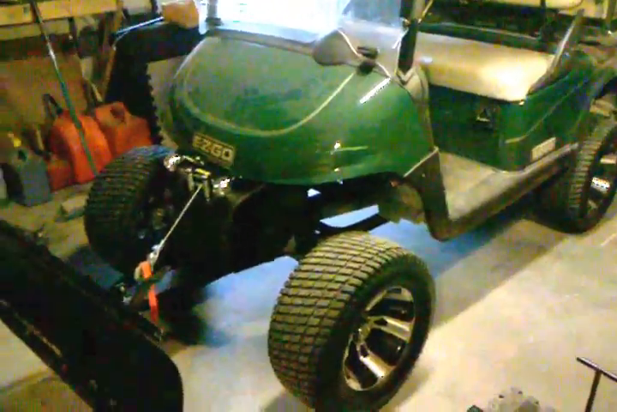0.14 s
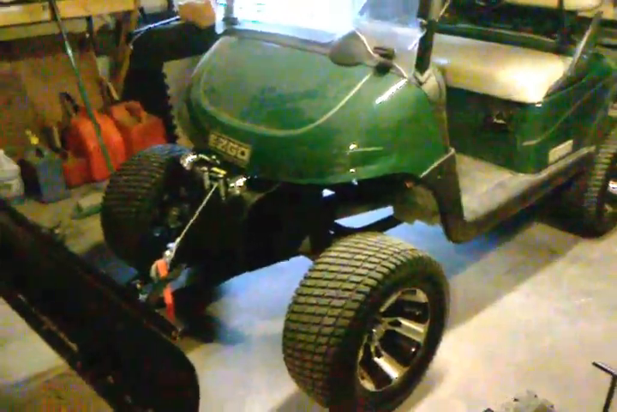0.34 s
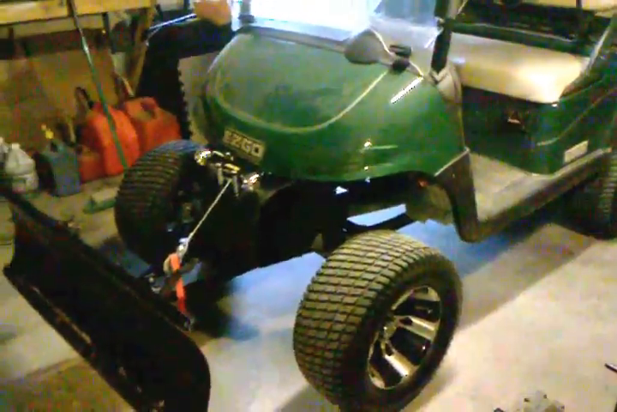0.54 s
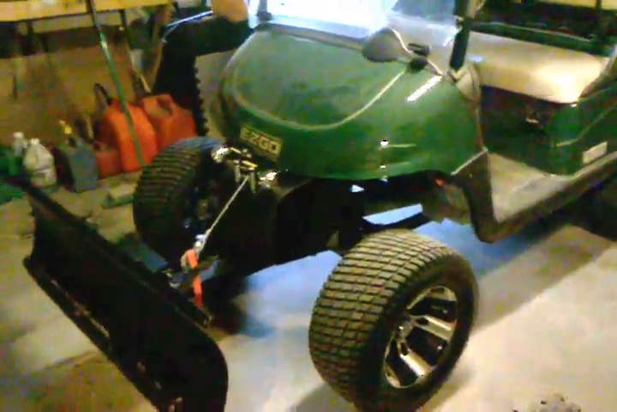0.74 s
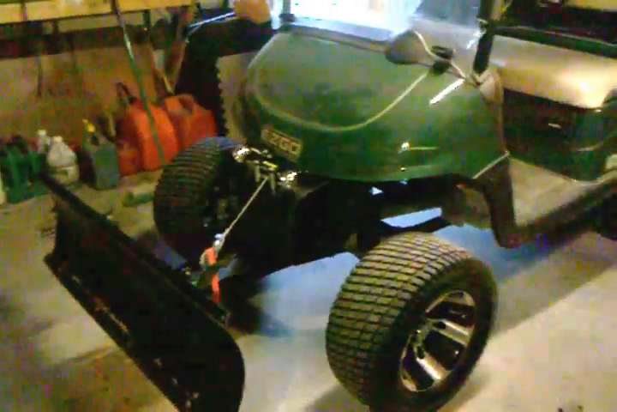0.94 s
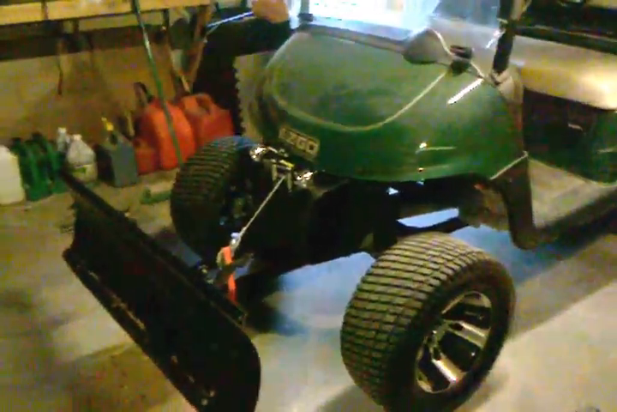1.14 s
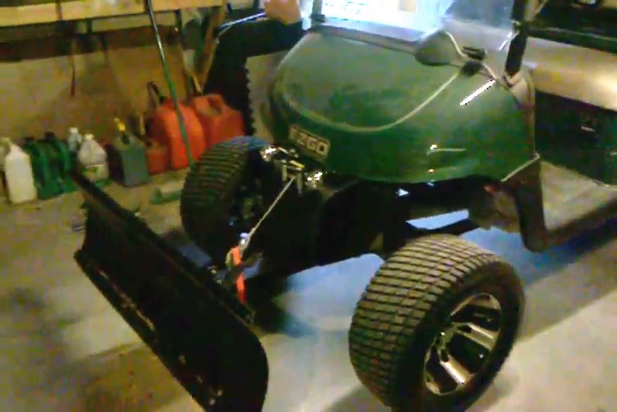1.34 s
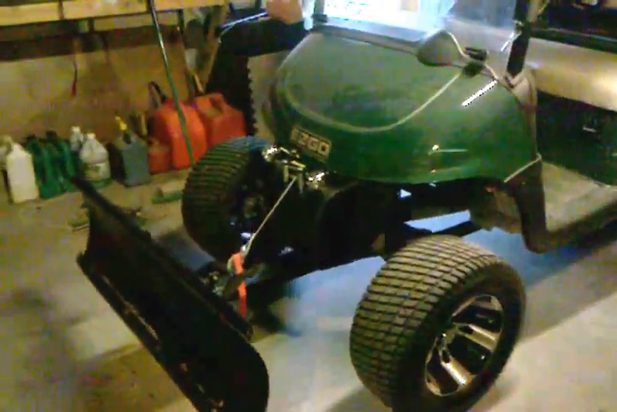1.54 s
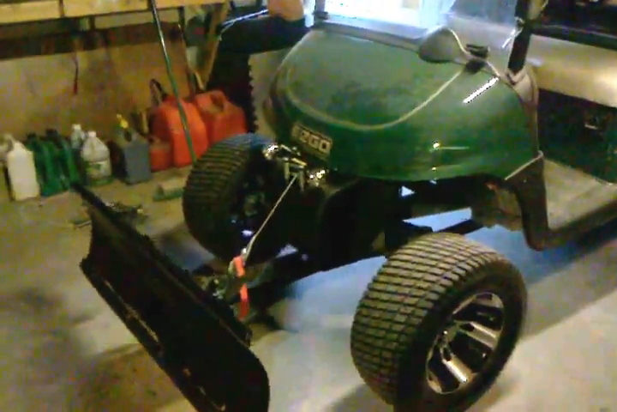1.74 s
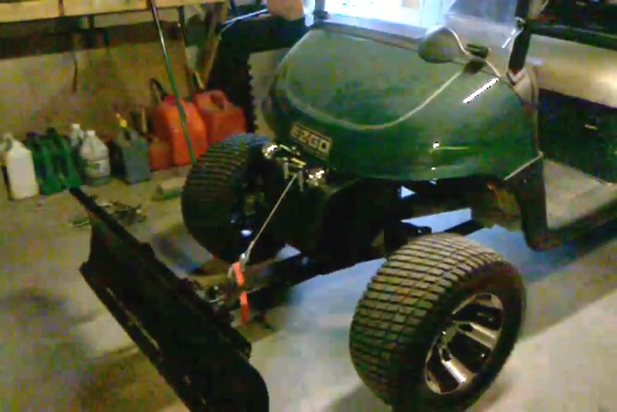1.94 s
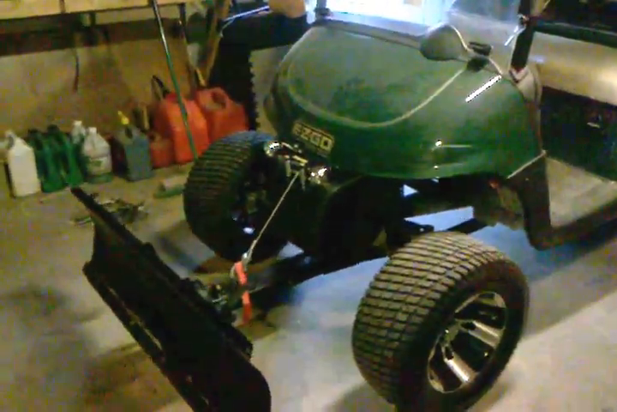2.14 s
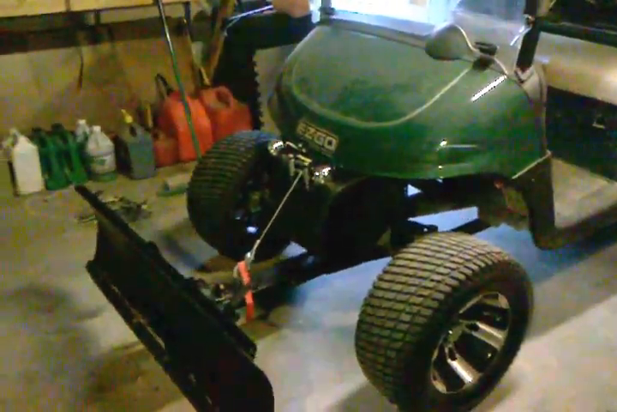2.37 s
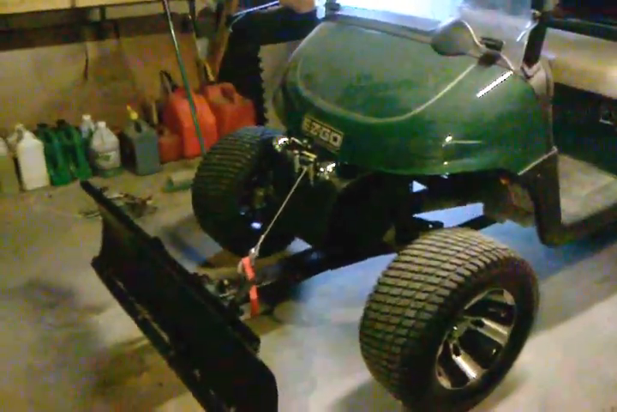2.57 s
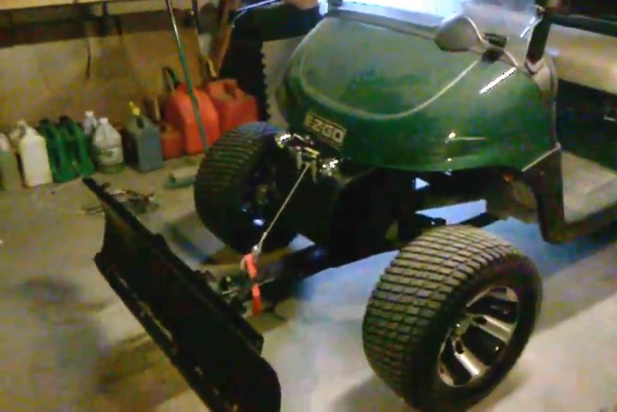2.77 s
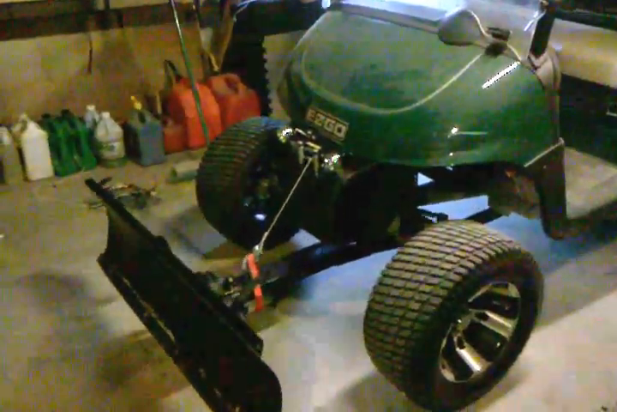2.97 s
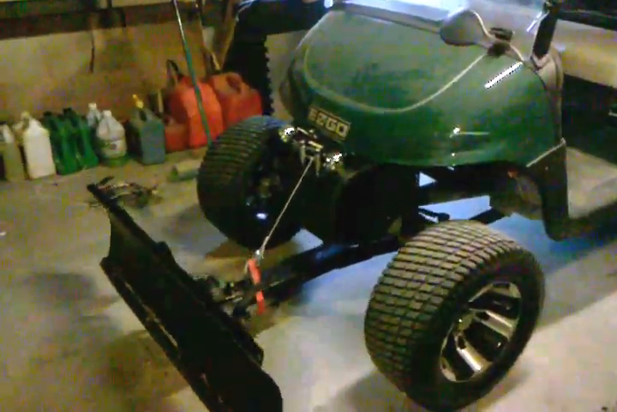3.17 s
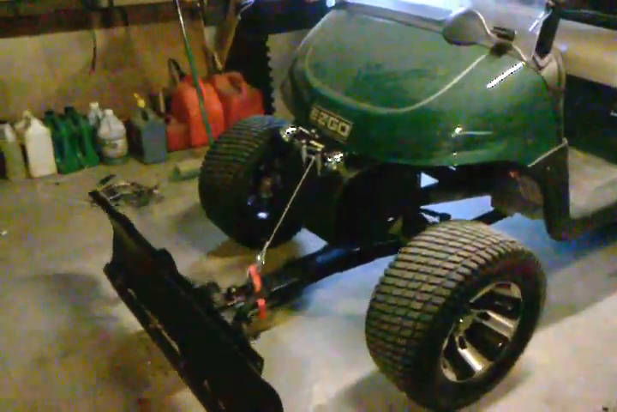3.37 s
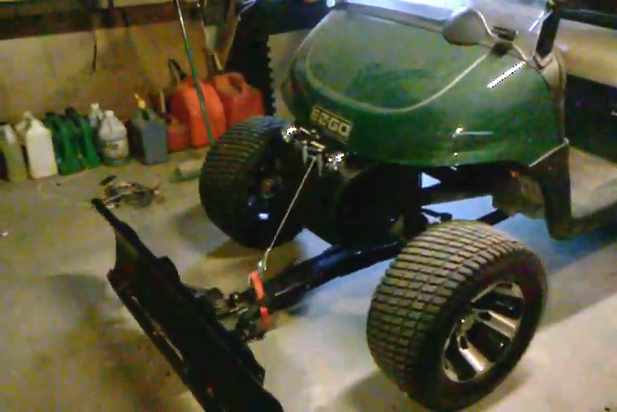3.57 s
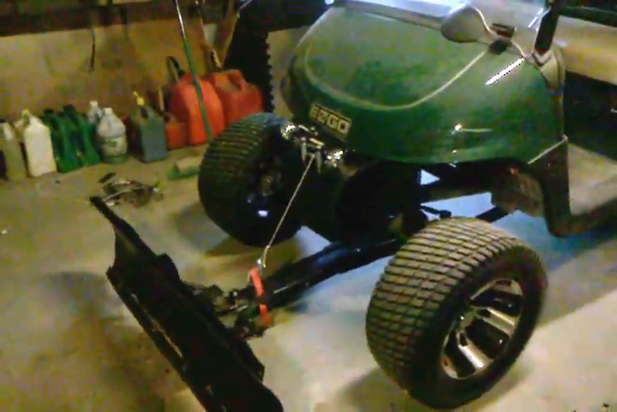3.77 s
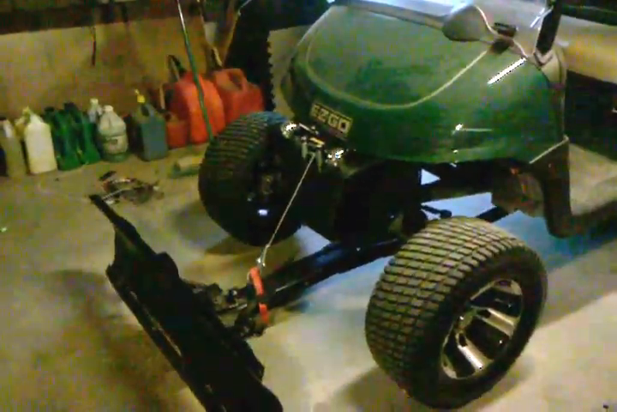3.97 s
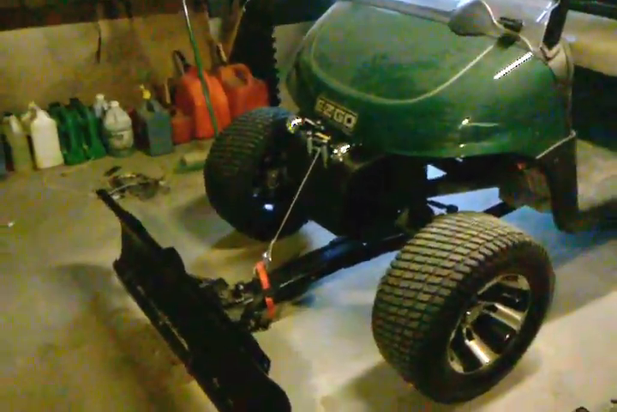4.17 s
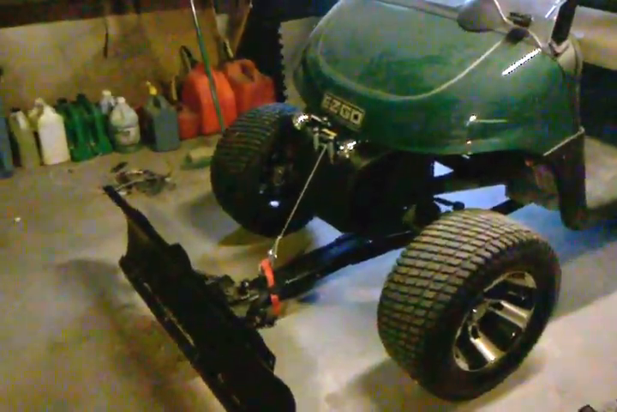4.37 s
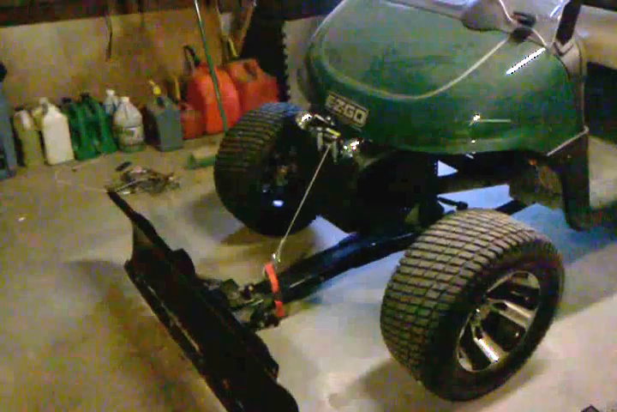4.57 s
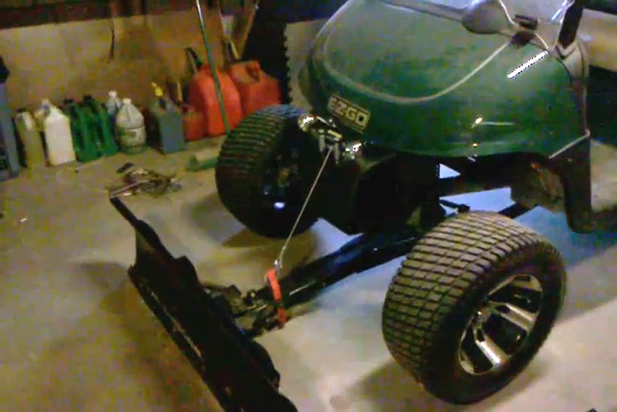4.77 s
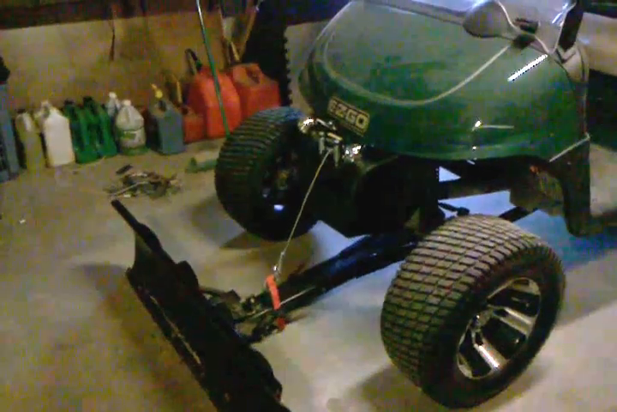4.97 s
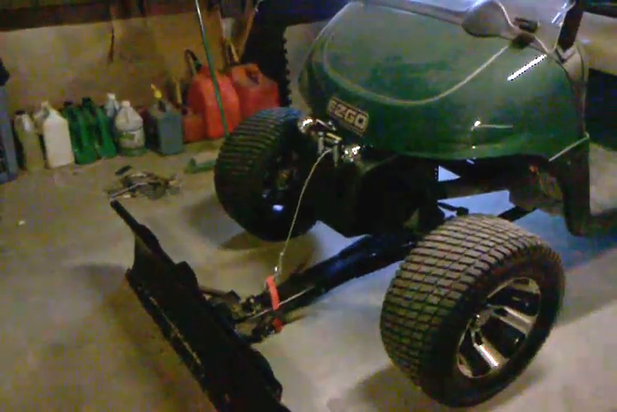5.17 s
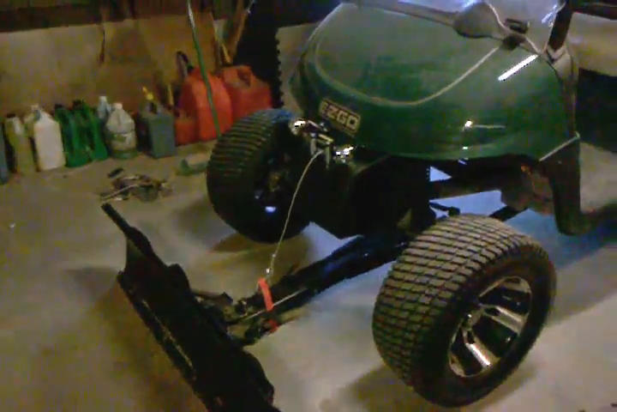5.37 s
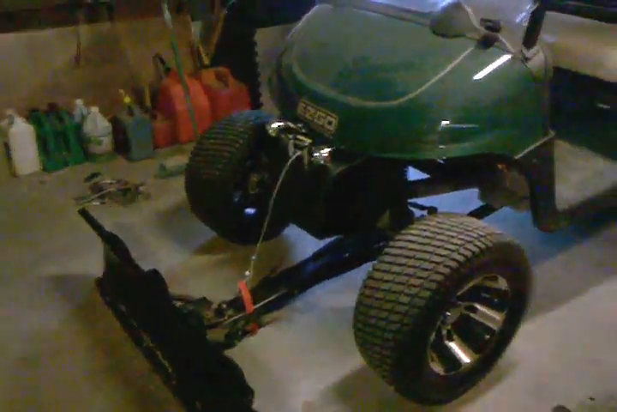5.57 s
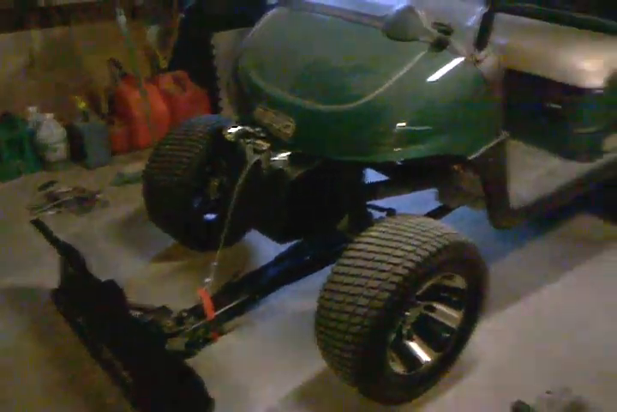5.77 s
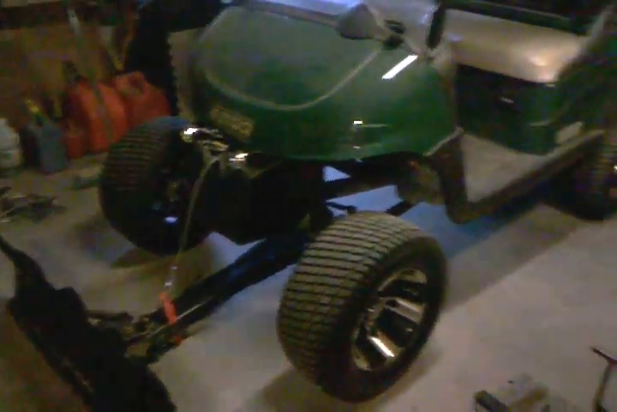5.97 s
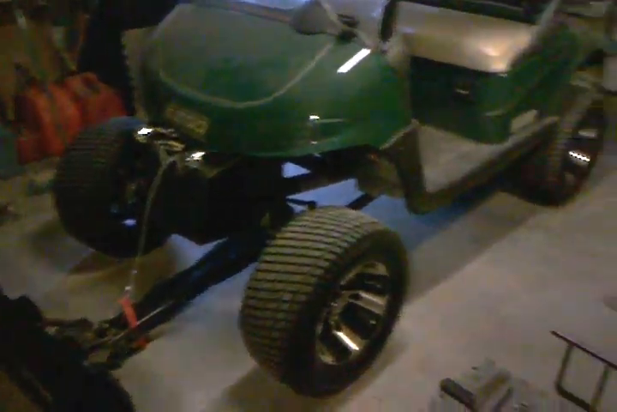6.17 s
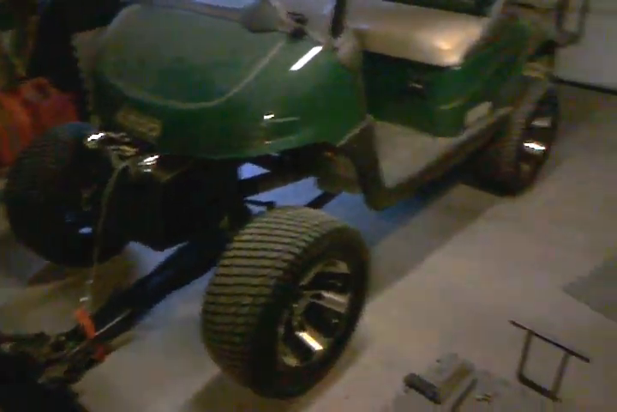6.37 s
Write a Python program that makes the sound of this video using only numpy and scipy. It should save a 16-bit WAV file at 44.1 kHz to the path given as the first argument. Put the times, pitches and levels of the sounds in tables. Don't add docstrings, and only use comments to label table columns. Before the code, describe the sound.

Sharp plastic clicks each precede a growling, whining little geared motor; after the third run heavy steel lands, grates briefly and hums on in a reverberant garage.

```python
import sys
import numpy as np
from scipy import signal
from scipy.fft import rfft, irfft, next_fast_len
from scipy.io import wavfile
from scipy.ndimage import uniform_filter1d

SR = 44100
rng = np.random.default_rng(int(sys.argv[2]) if len(sys.argv) > 2 else 0)


def materialize(psi):
    bounded = np.clip(np.atleast_2d(psi).T, -1, 1)
    quanta = np.round(bounded * 32767).astype(np.int16)
    wavfile.write(sys.argv[1], SR, quanta)


def linear_from_db(decibels):
    return 10 ** (np.asarray(decibels, float) / 20)


N = 282681
TIME = np.arange(N) / SR
SIZE = next_fast_len(N + SR)
FREQ = np.arange(SIZE // 2 + 1) * SR / SIZE

# (start [s], stop [s], growl level [dB], time to take up the slack [s])
BURSTS = [
    (1.401, 2.113, -20, 0.027),
    (2.833, 3.696, -20, 0.087),
    (4.467, 5.016, -20.5, 0.042),
]
CART_DB = -6


def shape(x, response):
    return irfft(rfft(x, SIZE) * response, SIZE)[..., :N]


def colour(points):
    hz, db = np.transpose(points)
    return linear_from_db(np.interp(np.log(FREQ + 1), np.log(hz), db, -120, -120))


def delay(samples):
    return np.exp(-2j * np.pi * FREQ * samples / SR)


def unit(x):
    return x / np.sqrt(np.mean(x ** 2))


def coloured_noise(points, channels=None):
    size = N if channels is None else (channels, N)
    return unit(shape(rng.standard_normal(size), colour(points)))


def walk(rate):
    k = int(SR / rate)
    steps = np.repeat(rng.standard_normal(N // k + 1), k)
    return unit(uniform_filter1d(uniform_filter1d(steps, k), k)[:N])


def ring(modes, s, push_s):
    start = int(s * SR)
    longest_s = max(t60 for _, _, t60 in modes)
    t = TIME[:min(N - start, int(SR * longest_s))]
    swing = sum(linear_from_db(db - 60 * t / t60) * np.sin(2 * np.pi * hz * t) for hz, db, t60 in modes)
    return np.pad(swing * (1 - np.exp(-t / push_s)), (start, N - start - len(t)))


def background():
    # (frequency [Hz], level [dB])
    rustle_colour = [(20, -30), (70, 6), (130, -14.5), (280, 5.5), (600, -3), (1000, -14.5), (2000, -16),
                     (2800, -32), (4000, -49)]
    # (frequency [Hz], level [dB])
    hiss_colour = [(1500, -2.5), (3000, 0), (4600, -1.5), (6000, 1), (7000, 1), (8100, 5.5), (8600, 0),
                   (11000, -1), (14200, -1)]
    # (frequency [Hz], level [dB])
    whistle_lines = [(1014, -81.5), (2028, -85.5)]
    # (middle [s], spread [s], rustle level [dB], hiss level [dB])
    stirs = [
        (.1, 0.16, -75, -77.5),
        (.5, 0.42, -68, -74),
        (2.75, 0.31, -64, -68),
        (4.45, 0.17, -67, -74),
        (5.701, 0.12, -64, -71),
        (5.901, 0.071, -66, -72),
        (6.4, 0.16, -80, -73),
    ]
    rest_rustle_db, rest_hiss_db = -67, -75
    murmur_db, murmur_t60_s = -63, 5.5
    rustle_level, hiss_level = linear_from_db(rest_rustle_db), linear_from_db(rest_hiss_db)
    for _, stop, _, _ in BURSTS:
        rustle_level = rustle_level + linear_from_db(murmur_db - 60 * (TIME - stop) / murmur_t60_s) * (TIME > stop)
    for middle, spread, rustle_db, hiss_db in stirs:
        swell = np.exp(-((TIME - middle) / spread) ** 2)
        rustle_level = rustle_level + linear_from_db(rustle_db) * swell
        hiss_level = hiss_level + linear_from_db(hiss_db - 5.5) * swell
    rustle = coloured_noise(rustle_colour, 2)
    rustle = rustle + 0.3 * rustle[::-1]
    rustle = rustle * linear_from_db(1.5 * walk(12)) * rustle_level
    hiss = coloured_noise(hiss_colour, 2) * linear_from_db(3.5) * hiss_level
    whistle = sum(linear_from_db(db) * np.sin(2 * np.pi * hz * TIME) for hz, db in whistle_lines)
    return rustle + hiss + whistle


def switch():
    # (time [s], peak level [dB], treble share [dB])
    clicks = [
        (1.196, -23.5, -1.5),
        (1.3, -41, -26),
        (2.627, -20, -4),
        (4.26, -22.5, -1.5),
    ]
    # (frequency [Hz], level [dB], t60 [s])
    rocker_modes = [(437, -9, 0.032), (1240, -11.5, 0.012), (1594, -14.5, 0.048), (2194, -9.5, 0.027),
                    (3350, -29, 0.0073), (4680, -2.5, 0.011), (5070, 7, 0.013), (5840, -10.5, 0.005),
                    (7100, 1.5, 0.013), (7750, 3.5, 0.016), (9550, -1, 0.014), (12700, -3, 0.015)]
    # (frequency [Hz], level [dB])
    snap_colour = [(200, -21), (1200, -1), (2200, -2.5), (3600, -13.5), (5000, -10), (7500, 4),
                   (9500, -6.5), (14000, -6)]
    crackle = coloured_noise(snap_colour, 2)
    dull = shape(crackle, 1 / (1 + (FREQ / 2500) ** 4))
    bright = crackle - dull
    out = 0
    for s, db, treble_db in clicks:
        t = TIME - s - .002
        after = np.maximum(t, 0)
        fade = linear_from_db(-60 * after / .0085) + linear_from_db(-16.5 - 60 * after / 0.062)
        snap = np.exp(np.minimum(t / 0.00075, 0)) * fade
        modes = [(hz, g + (treble_db if hz > 3000 else 0), t60) for hz, g, t60 in rocker_modes]
        out = out + linear_from_db(db - 10) * ring(modes, s + 0.0005, 0.00032)
        out = out + linear_from_db(db - 7) * snap * (dull + linear_from_db(treble_db) * bright)
    return out


def tooth_knocks(hz, phase):
    meets = np.flatnonzero(np.diff(np.floor(phase)))
    chance = rng.standard_normal((N // 100, 3))[:len(meets)]
    wear = rng.standard_normal(8)[np.arange(len(meets)) % 8]
    slip = (0.293 * chance[:, 0] * SR / hz[meets]).astype(int)
    knocks = np.zeros(N)
    np.add.at(knocks, np.clip(meets + slip, 0, N - 1), 1 + 0.71 * wear + 0.36 * chance[:, 1])
    return unit(knocks - knocks.mean())


def housing_growl(hz, phase, growl_db):
    # (frequency [Hz], width [Hz], level [dB])
    housing = [(154.4, 12, -3.5), (203, 15.4, -4), (299.5, 14, 3.5), (344.8, 8.4, 9), (682, 120, -5),
               (800, 33, -7.5), (942, 12, -3), (1086, 17, -3.5), (1237.5, 24, 2.5), (1298, 40, -2),
               (1419, 50, -1.5), (1529, 39, -6), (1796, 170, -6), (1870, 40, -17.5), (2156, 60, -9.5),
               (2315, 55, -6.5)]
    # (frequency [Hz], level [dB])
    growl_colour = [(20, -23), (70, -19), (125, -17), (300, 1.5), (450, -1.5), (800, -2.5), (1400, -1.5),
                    (2200, -5), (3000, -7.5), (4000, -20), (6000, -34.5)]
    rubbing = rng.standard_normal(N) * (1 + 0.064 * np.cos(2 * np.pi * phase))
    rattle = tooth_knocks(hz, phase) + 1.33 * rubbing
    body = 0.66
    for f, width, db in housing:
        damping = 1j * FREQ * width
        body = body + linear_from_db(db) * damping / (f ** 2 - FREQ ** 2 + damping)
    growl = unit(shape(rattle, body * colour(growl_colour)))
    return growl * linear_from_db(growl_db + 1.3 * walk(27.01))


def brush_hiss(phase, hiss_db):
    # (frequency [Hz], level [dB])
    brush_colour = [(2000, -54), (3000, 10.5), (3700, -16), (4700, -8.5), (6000, 2.5), (7300, 0),
                    (8200, -1.5), (8600, -3), (11000, -10.5), (14200, -15.5)]
    sparks = rng.standard_normal(N) * (1 + .08 * np.cos(2 * np.pi * phase))
    return unit(shape(sparks, colour(brush_colour))) * linear_from_db(hiss_db + 2.0 + 2.2 * walk(23.71))


def gear_whine(burst, age, phase, growl_db):
    # (1x tooth rate [dB], 2x [dB], 4x [dB])
    burst_whines = [
        (-4, -10, -15),
        (-7.5, -6, -12),
        (-5.5, -10.5, -9),
    ]
    # (multiple of tooth rate, level above the growl [dB])
    other_orders = [(.5, -27), (3, -21.5), (5, -15), (6, -26), (7, -20.5)]
    taut_s = (.10, .165, .14)
    whine_db, loose_cable_db = 4.5, -14
    lurch_db, lurch_s = -2, 0.064
    wander_db, wobble_rad = 2.0, .16
    first_db, second_db, fourth_db = np.transpose(burst_whines)[:, burst]
    loose_db = loose_cable_db * np.clip((np.take(taut_s, burst) - age) / 0.0304, 0, 1)
    lowest_db = first_db - loose_db + lurch_db * np.exp(-age / lurch_s)
    orders = [(1, lowest_db), (2, second_db), (4, fourth_db - 4.0), *other_orders]
    runout = 2 * np.pi * phase / 8
    whine = 0
    for k, db in orders:
        level = linear_from_db(growl_db + loose_db + db + whine_db + wander_db * walk(24.04))
        swell = 1 + 0.33 * np.cos(runout + k)
        whine = whine + level * swell * np.sin(k * (2 * np.pi * phase + wobble_rad * walk(30)))
    return whine


def winch():
    run_hz = 313.5
    start_share, spin_up_s = .62, .042
    growl_start_db, growl_rise_s = -19.5, 0.018
    brush_db, brush_start_db, brush_rise_s = -18, -4.5, 0.067
    slack_db = -5
    linger_db, linger_s = -13.5, 0.072
    burst = np.searchsorted([b[0] for b in BURSTS[1:]], TIME)
    start, stop, level_db, slack_s = np.transpose(BURSTS)[:, burst]
    age = np.maximum(TIME - start, 0)
    since_stop = np.maximum(TIME - stop, 0)
    level_db = level_db + slack_db * np.exp(-age / slack_s)
    hz = run_hz * (1 - (1 - start_share) * np.exp(-age / spin_up_s) + 0.000987 * walk(4))
    phase = np.cumsum(hz) / SR
    growl_db = level_db + growl_start_db * np.exp(-age / growl_rise_s)
    hiss_db = level_db + brush_db + brush_start_db * np.exp(-age / brush_rise_s)
    power = np.clip(age / 0.0052, 0, 1) * np.exp(-since_stop / 0.015)
    linger = linear_from_db(linger_db) * (TIME > stop) * np.exp(-since_stop / linger_s)
    noise = power * housing_growl(hz, phase, growl_db)
    noise = noise + np.maximum(power, linger) * brush_hiss(phase, hiss_db)
    return noise, power * gear_whine(burst, age, phase, growl_db)


def blade_blows():
    # (time [s], thud level [dB], clang level [dB], crack level [dB])
    blows = [
        (2.125, -57, -57, -31),
        (2.498, -56, -69, -70),
        (3.69, -39, -48, -34),
        (4.92, -22.5, -63, -36),
        (4.975, -19, -39, -13),
        (4.995, -15, -46, -18.5),
        (5.04, -25, -59, -41),
        (5.274, -62, -26, -25),
    ]
    # (frequency [Hz], level [dB], t60 [s])
    frame_modes = [(150.8, 1, 0.21), (227.5, -8.5, 0.25), (316, 6.5, 0.097), (357, 2.5, 0.13),
                   (690, -13.5, 0.27), (710.5, -2.5, 0.41), (789.4, -7, 0.23), (1175, -23.5, .3)]
    # (frequency [Hz], level [dB], t60 [s])
    sheet_modes = [(1107, -20, .4), (1284, -12.5, .3), (1470, -10, .25), (1502, -2, 0.42), (1562, 1, 0.22),
                   (1936, -6, .2), (2520, -14, .2)]
    # (frequency [Hz], level [dB])
    crack_colour = [(150, -16), (500, 6.5), (1500, -5), (2500, -1), (4000, -10.5), (5500, -28), (8000, -23),
                    (14000, -53)]
    crack = coloured_noise(crack_colour)
    out = np.zeros(N)
    for s, thud_db, clang_db, crack_db in blows:
        out += linear_from_db(thud_db) * ring(frame_modes, s, 0.0026)
        out += linear_from_db(clang_db) * ring(sheet_modes, s, 0.0017)
        out += linear_from_db(crack_db - 60 * np.abs(TIME - s) / 0.06) * crack * (TIME > s)
    return out


def blade_scrape():
    # (frequency [Hz], level [dB])
    grit_colour = [(150, -9), (500, -3), (1500, -5.5), (2500, -6), (4000, -21.5), (5500, -20.5),
                   (7300, -17.5), (9000, -22), (14000, -34.5)]
    start_s, end_s, rise_s, t60_s = 4.99, 5.31, 0.023, 0.04
    level_db = -34.5 - 60 * np.maximum(TIME - end_s, 0) / t60_s + 1.5 * walk(60)
    return coloured_noise(grit_colour) * np.clip((TIME - start_s) / rise_s, 0, 1) * linear_from_db(level_db)


def blade_hum():
    # (frequency [Hz], level [dB], t60 [s])
    hum_modes = [(311, -3, 3), (384, 5, 4.5), (498, -1.5, 6.8), (579.6, -15, 3.), (640, -5, 5.9),
                 (714, -7, 3.6), (1030, -10, 3.8), (1250, -5.5, 2.63), (1460, -9.5, 2.2), (1647, 3, 2.1),
                 (1690, -6, 3.5)]
    start_s, hum_db, waver_db = 4.99, -51, 3.2
    return sum(linear_from_db(hum_db - 1.0 + waver_db * walk(21.97)) * ring([mode], start_s, .01) for mode in hum_modes)


def diffuse(a, b):
    port_gap_m, sound_speed = 0.18, 343
    like = np.sinc(2 * FREQ * port_gap_m / sound_speed)
    mid = shape(a, np.sqrt((1 + like) / 2))
    side = shape(b, np.sqrt((1 - like) / 2))
    return np.array([mid + side, mid - side])


def garage(x):
    # (frequency [Hz], t60 [s])
    garage_t60 = [(150, 0.64), (300, 0.87), (600, 0.66), (1200, 0.64), (2400, 0.59), (4800, 0.55),
                  (9600, 0.35)]
    t, tail = TIME[:SR], 0
    tail_hz = np.arange(SR // 2 + 1)
    for hz, t60 in garage_t60:
        octave = np.cos(np.pi / 2 * np.clip(np.log2((tail_hz + 1) / hz), -1, 1))
        band = irfft(rfft(rng.standard_normal((2, SR))) * octave)
        tail = tail + band * linear_from_db(-60 * t / t60) * (t > .006)
    tail = tail / np.sqrt(np.sum(tail[0] ** 2))
    return diffuse(*shape(tail, rfft(x, SIZE)))


def scene():
    room = background()
    click = linear_from_db(-6) * switch()
    noise, whine = winch()
    noise, whine = linear_from_db(CART_DB) * noise, linear_from_db(CART_DB) * whine
    steel = linear_from_db(CART_DB) * (blade_blows() + blade_scrape() + blade_hum())
    near_port = noise + whine + steel
    far_port = shape(near_port, delay(4.06 / (1 + (FREQ / 2000) ** 2)))
    echoes = garage(noise + linear_from_db(-2.0) * steel + linear_from_db(-11) * whine + 0.08 * click[0])
    return np.array([near_port, far_port]) + click + linear_from_db(-2.5) * echoes + room


def low_pass(x):
    return signal.sosfilt(signal.butter(12, 14900, fs=SR, output="sos"), x)


def record(dry):
    # (frequency [Hz], level [dB])
    width_colour = [(1, -5), (100, 0.5), (300, 1), (550, -2), (1200, -1.5), (2200, 3), (9000, 1.5),
                    (13000, 2.5), (23000, 5.5)]
    steer_lag = 14.9
    steered = dry - shape(dry[::-1], delay(steer_lag))
    for order in (2, 3, 4):
        null = delay(37) * np.exp(-((FREQ - order * SR / steer_lag) / 600) ** 2)
        filled = np.clip(3 * (walk(22) + .9), 0, 1)
        steered = steered + linear_from_db(-6.5) * filled * shape(steered[0] - steered[1], null)
    side = (steered[0] - steered[1]) / 2
    extra = shape(side, colour(width_colour)) - side
    steered = steered + extra * np.array([[1], [-1]])
    rumble = coloured_noise([(20, -28), (45, -27), (65, -8), (90, -5.5), (200, -1), (400, -38)], 2)
    return low_pass(steered + linear_from_db(-74.0) * rumble)


dry = scene()
out = record(dry)
materialize(out)
```